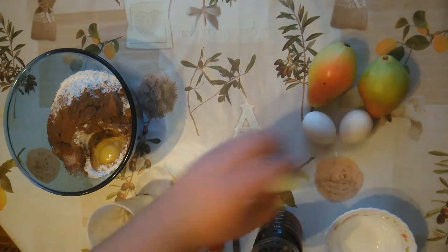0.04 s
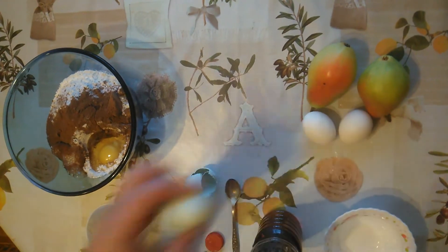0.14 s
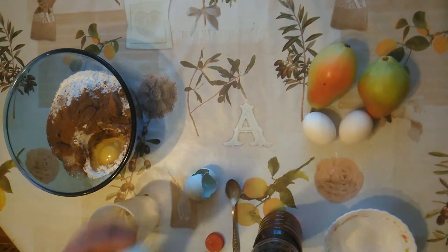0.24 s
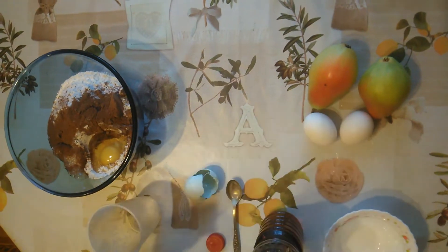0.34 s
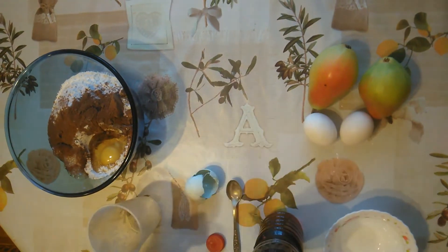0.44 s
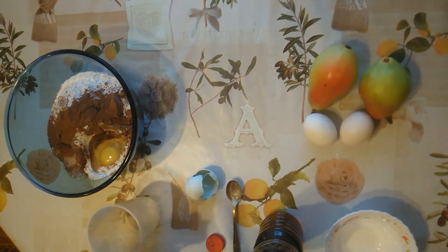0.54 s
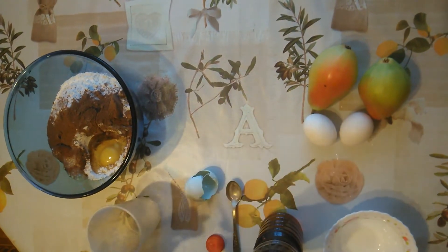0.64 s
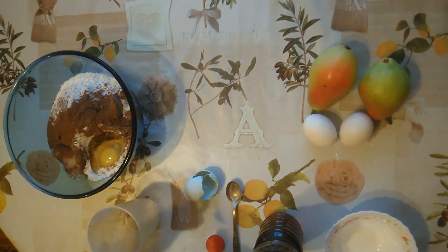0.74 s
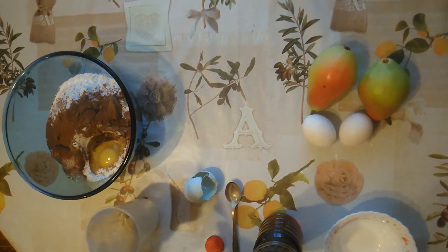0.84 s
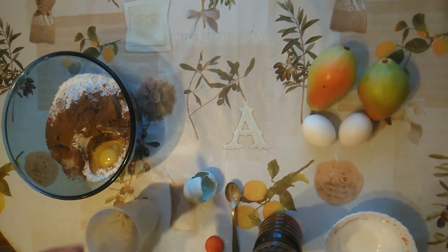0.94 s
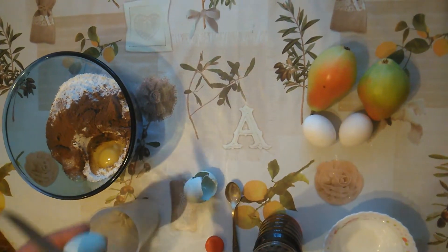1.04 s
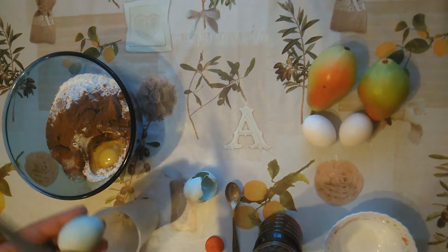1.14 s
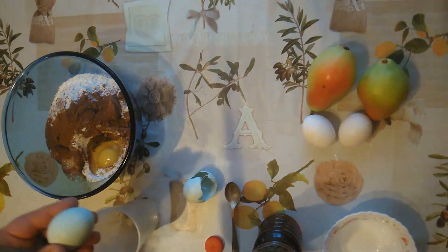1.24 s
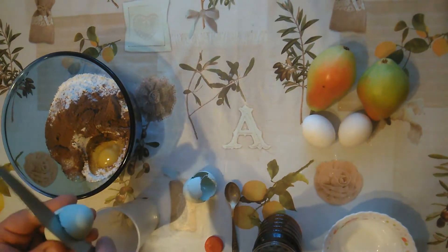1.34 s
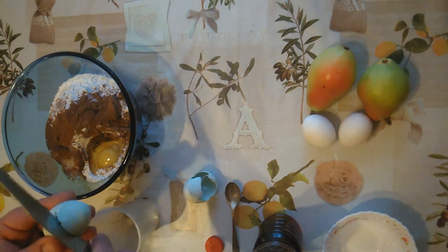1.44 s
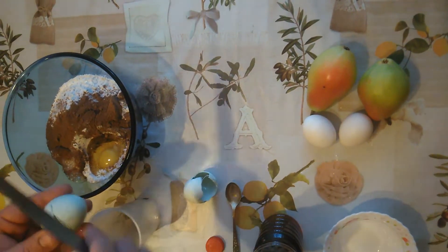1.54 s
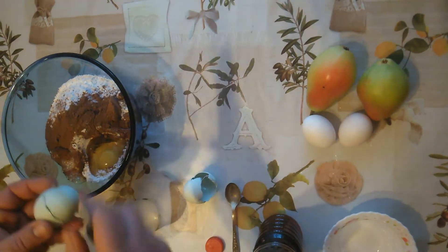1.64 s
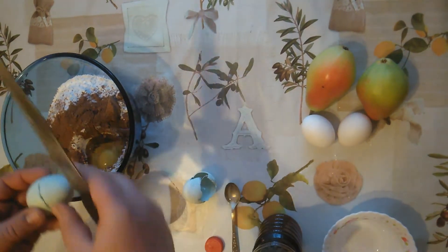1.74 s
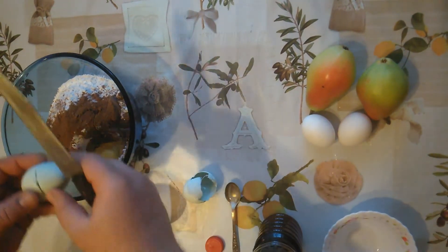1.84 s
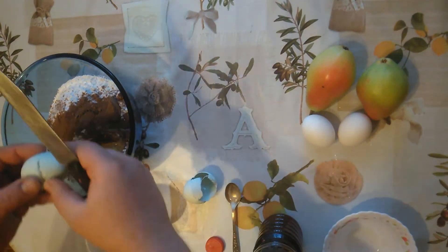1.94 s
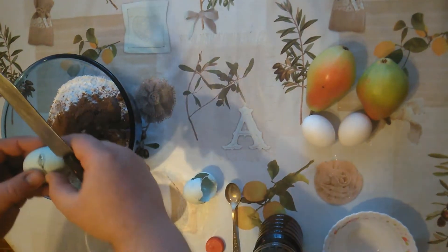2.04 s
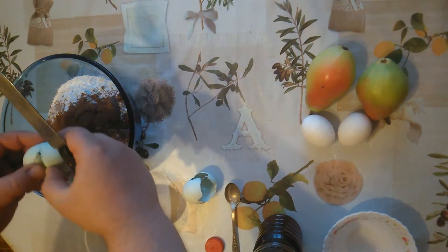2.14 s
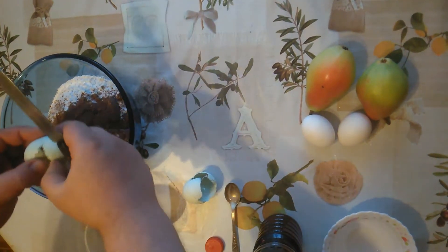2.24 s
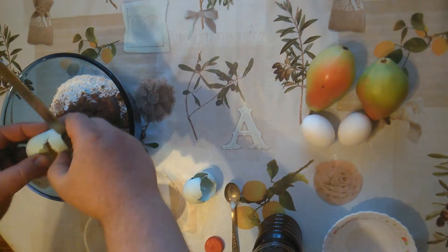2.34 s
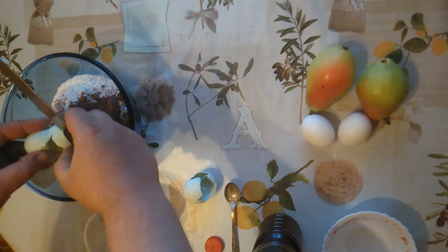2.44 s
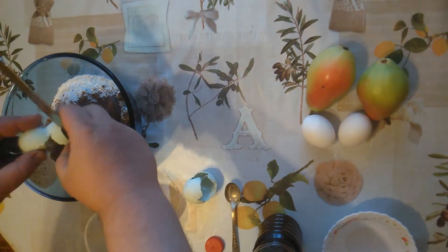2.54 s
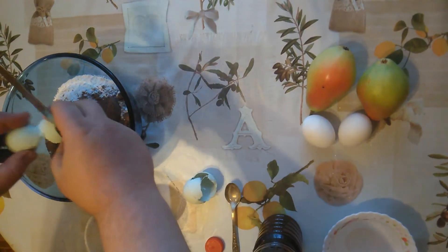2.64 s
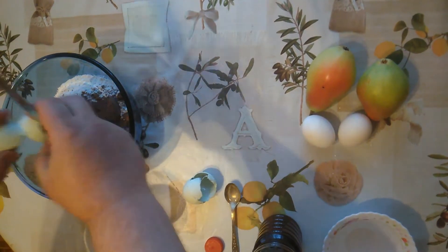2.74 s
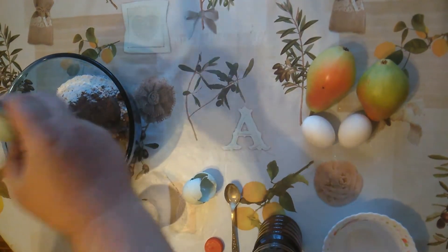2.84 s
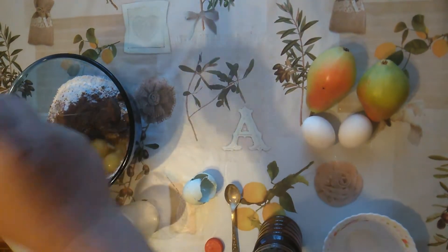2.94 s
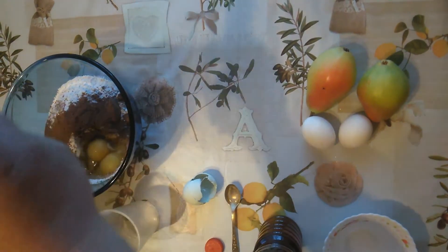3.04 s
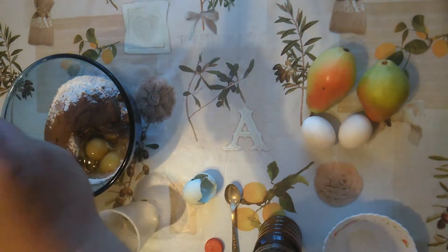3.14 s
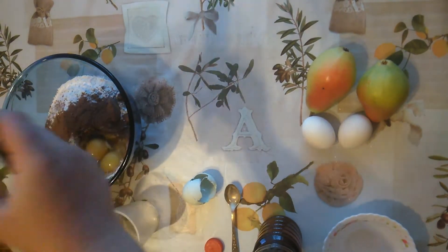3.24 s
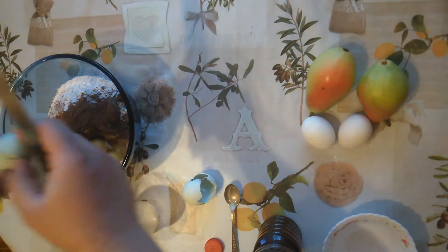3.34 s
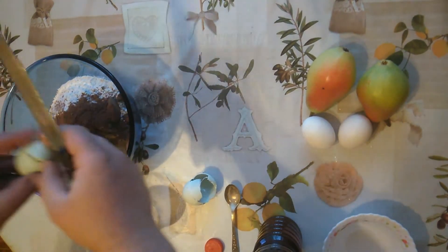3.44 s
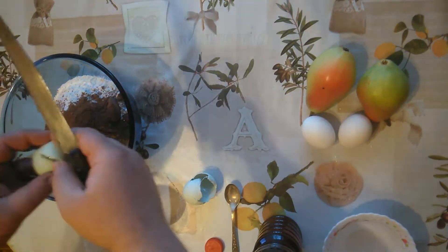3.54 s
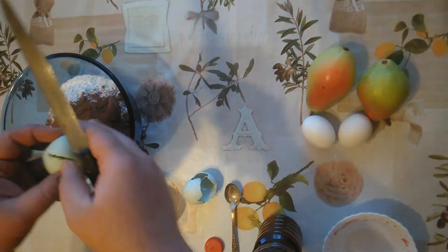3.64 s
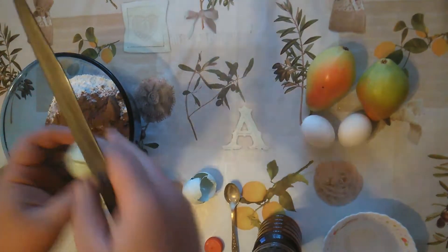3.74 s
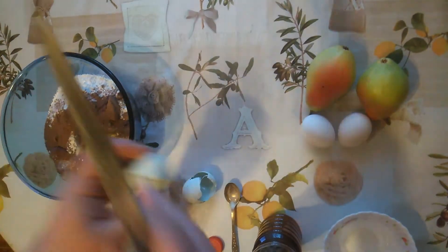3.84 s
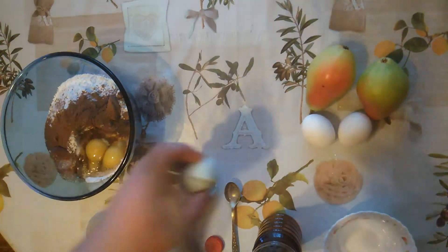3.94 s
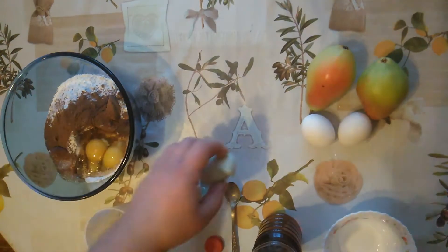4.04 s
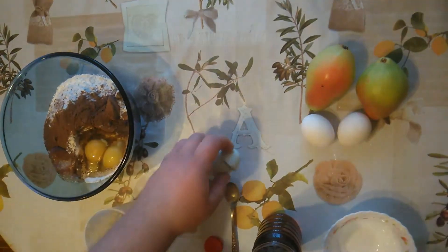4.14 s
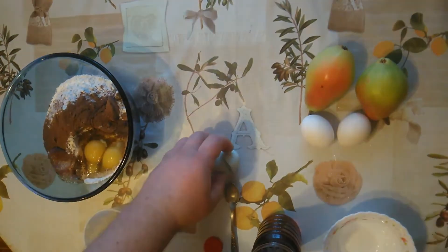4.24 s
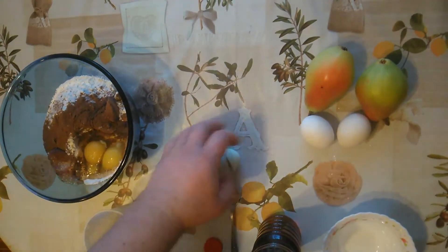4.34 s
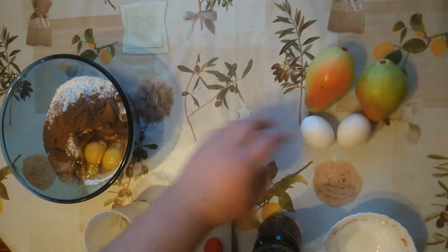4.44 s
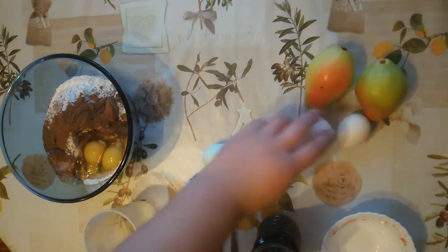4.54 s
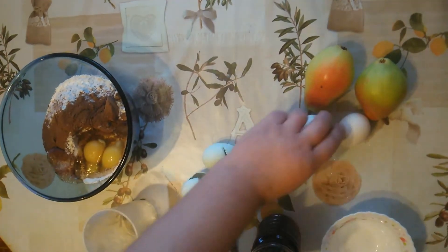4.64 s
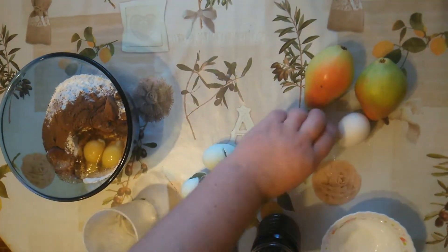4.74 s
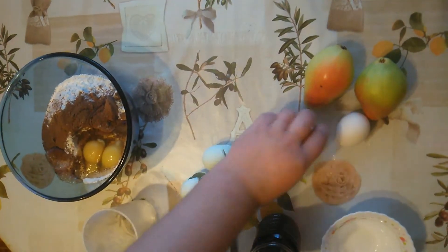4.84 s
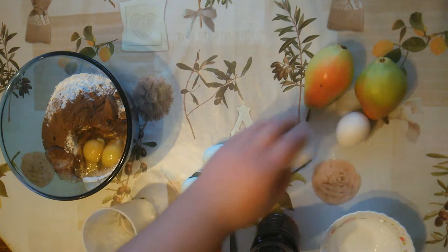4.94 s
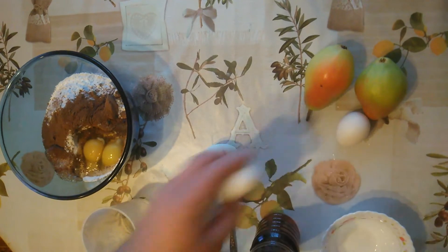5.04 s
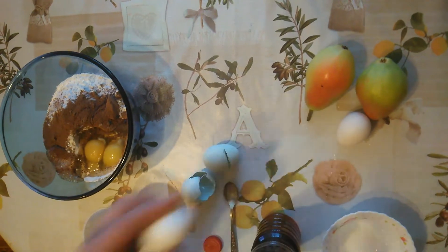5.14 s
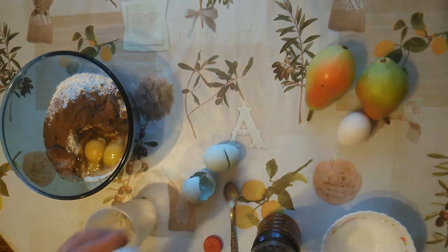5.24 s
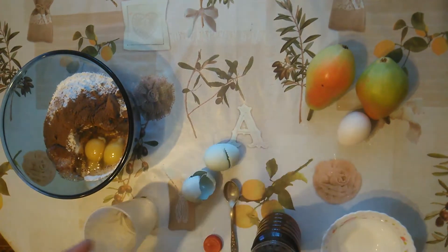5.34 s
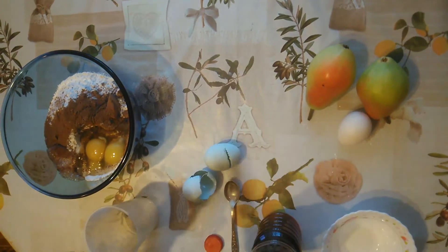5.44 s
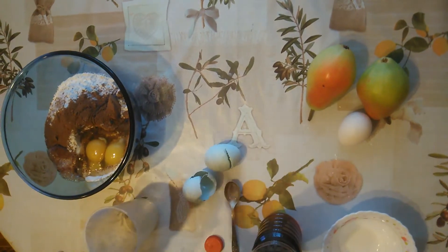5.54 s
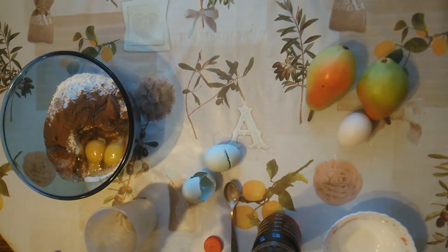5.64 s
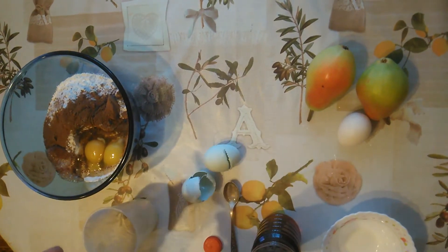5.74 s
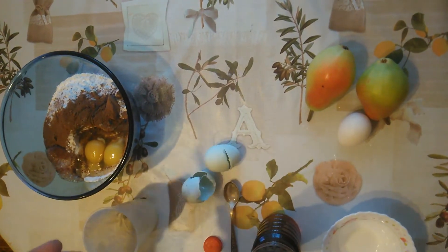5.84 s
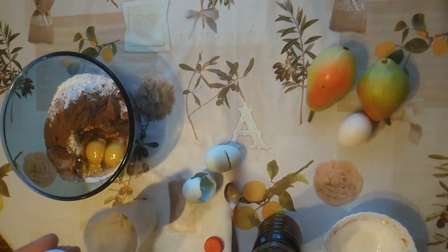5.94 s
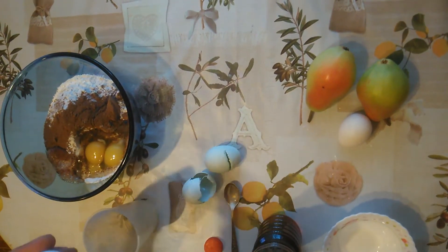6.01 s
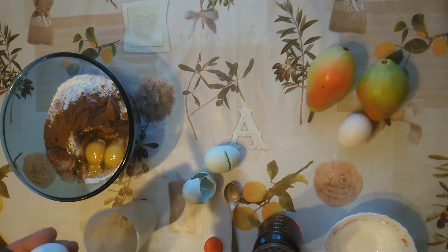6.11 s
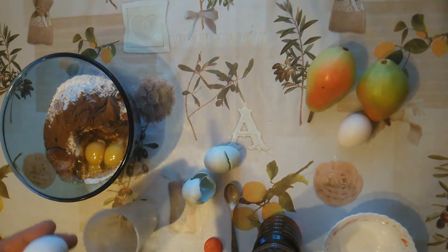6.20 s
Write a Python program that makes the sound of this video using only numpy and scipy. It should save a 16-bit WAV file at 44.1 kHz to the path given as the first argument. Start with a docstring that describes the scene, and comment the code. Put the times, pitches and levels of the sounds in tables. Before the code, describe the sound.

Egg cracked with a kitchen knife: a sharp tap, brittle shell crunching, soft table bumps, light clatter, then another tap.

```python
"""A kitchen knife cracks an egg over a glass bowl in a small kitchen. The blade knocks the egg, sinks in steps
and rings. As it prises the shell open, the edges grind and snap into a hollow of falling pitch; the halves
crackle and are laid on the table. Something clatters lightly, as of the knife being taken up, and the knife
strikes again. Underneath: arm movement, soft bumps, still air, an appliance's whine and a faint passing tone."""
import sys
import numpy as np
from scipy import signal
from scipy.fft import rfft, irfft, next_fast_len
from scipy.io import wavfile

SR = 44100
rng = np.random.default_rng(int(sys.argv[2]) if len(sys.argv) > 2 else 0)


def file_out(sig):
    """Save sig as 16-bit WAV at sys.argv[1]."""
    # one column per channel
    cols = np.atleast_2d(sig).T
    # limit, then scale
    lim = np.clip(cols, -1, 1)
    pcm = np.round(lim * 32767).astype(np.int16)
    wavfile.write(sys.argv[1], SR, pcm)


N = 276507
TIME_S = np.arange(N) / SR

# still air: (frequency [Hz], gain [dB])
AIR_SPECTRUM = [(30, -18.5), (100, -11.5), (250, -4), (400, -4), (800, -0.5), (1150, -15), (1350, -18.5),
                (2500, -16.5), (3100, -28), (4500, -27.5), (7000, -36), (12500, -41), (16000, -54.5)]
# appliance whine: (frequency [Hz], rms [dB])
WHINE_PARTIALS = [(1086, -71), (2077, -71.5)]
# faint tone: (start [s], end [s], level [dB], frequency [Hz])
TONE_SWELLS = [(1.14, 1.42, -54, 696), (2.34, 2.58, -57, 698), (2.96, 3.22, -52, 694)]

# arm movement: (time [s], boom [dB], rustle [dB])
ARM_LEVELS = [(0, -67, -55), (0.18, -64, -50.5), (0.35, -70, -63.5), (0.7, -68, -61.5), (1.3, -61.5, -53),
              (1.7, -67, -53), (2.0, -64.5, -60), (2.19, -60.5, -50), (2.28, -64.5, -60),
              (2.45, -54, -50.5), (2.72, -53, -46), (2.95, -52, -56.5), (3.25, -58, -55.5), (3.6, -51, -49),
              (3.9, -54.5, -52), (4.25, -65, -57.5), (4.45, -54, -51), (5.1, -57, -59), (5.8, -52.5, -55),
              (6.27, -61, -56)]
# hands and eggs bumping the table: (peak time [s], level [dB])
TABLE_BUMPS = [(0.1, -58.5), (0.2, -51.5), (0.52, -61), (1.12, -52.5), (1.33, -54.5), (2.36, -47),
               (2.72, -51), (4.001, -48.5), (4.079, -41), (4.17, -46.5), (4.86, -47), (4.93, -44.5),
               (5.1, -48.5), (5.26, -44), (5.6, -45), (5.67, -45.5), (6.04, -56)]
# low resonances: (frequency [Hz], width [Hz], gain [dB])
BOOM_MODES = [(221.9, 11.5, 0), (262.2, 24, 2), (304, 51, -6.5), (342, 300, -19.5), (144, 94, -20.5)]
# arm rustle: (frequency [Hz], gain [dB])
RUSTLE_SPECTRUM = [(100, -18), (300, -3.5), (450, 0), (750, 0.5), (1150, -8), (1700, -15), (2550, -10.5),
                   (3100, -21.5), (4600, -22), (7000, -32), (15000, -43)]

# rubs on shell or table: (start [s], end [s], level [dB], resonance [Hz], width [Hz], grit [dB])
RUB_STROKES = [(0.882, 0.917, -65.5, 3330, 1490, -30), (1.288, 1.359, -57, 157, 70.8, -29.5),
               (1.556, 1.58, -43.5, 5250, 800, -6), (1.574, 1.602, -39, 1160, 455, 3.5),
               (1.578, 1.604, -36, 3670, 696, -18), (2.148, 2.252, -54.5, 2740, 135, 0.5),
               (3.286, 3.41, -62, 94, 70, -34), (5.60, 5.684, -62.5, 112, 71, -26),
               (6.098, 6.105, -44, 1980, 400, -28), (6.143, 6.17, -44, 2070, 600, -33)]
# splintering shell: (frequency [Hz], gain [dB])
SPLINTER_SPECTRUM = [(100, -47.5), (400, -21), (900, 4.5), (2400, 13), (3150, 4), (4200, 4.5), (5800, -0.5),
                     (6700, -9), (11500, -20), (16000, -34)]

# knife strikes: (time [s], level [dB], sinking time [s], blade ring [dB], shell crunch [dB])
KNIFE_STRIKES = [(1.4006, -1, .019, -6, -22), (6.1604, 1.5, .002, -30, -29.5)]
# full egg: (frequency [Hz], width [Hz], gain [dB])
EGG_MODES = [(880, 280, -1), (1237, 200, 2), (2076, 180, 4), (2770, 880, -9), (3370, 870, -12.5),
             (4570, 530, -17.5)]
# knife blade: (frequency [Hz], level [dB], T60 [s])
BLADE_MODES = [(765, -7, .13), (867, 0, .13), (1112, -10, .13), (1240, -12, .13), (1938, -8, .07),
               (2130, -8, .12), (2195, -7, .09), (2490, -15, .15), (2692, -12, .16), (2845, -16, .16),
               (3558, -13, .11), (5017, -21, .1)]

# hollow under the shell, falling as the egg opens: (time [s], pitch [Hz])
HOLLOW_PITCH = [(2.376, 3390), (2.40, 2600), (2.455, 2290), (2.468, 1710), (2.505, 1506), (3.35, 1440),
                (3.56, 1360), (3.7, 1422), (4.38, 1377), (4.42, 1270)]
# gestures that grind the broken edges: (time [s], force [dB], brightness [dB])
GRIND_PRISING = [(2.372, -59, -11), (2.38, -31.5, -15), (2.455, -40, -9), (2.48, -36.5, -3.5),
                 (2.53, -36, -1.5), (2.58, -48.5, -18), (2.69, -76, -26), (2.72, -48, 0), (2.79, -71, -12),
                 (2.87, -55, -25), (2.93, -71, -18)]
GRIND_SQUEEZING = [(3.07, -64.5, 1), (3.28, -56.5, -6.5), (3.32, -44, -5.5), (3.45, -44, -5.5),
                   (3.48, -35, -27), (3.56, -30, -4.5), (3.625, -39.5, -1), (3.66, -35, 6),
                   (3.71, -35.5, 0.5), (3.74, -53, 5)]
GRIND_SETTING_DOWN = [(4.3, -57, -20), (4.335, -43.5, -14.5), (4.365, -42, -10), (4.39, -33, -7.5),
                      (4.44, -37.5, -14.5), (4.48, -49.5, -9), (4.58, -51.5, -5), (4.8, -54.5, -8.5),
                      (4.92, -63, -6.5)]
# shell snaps: (time [s], body [dB], treble [dB])
SHELL_SNAPS = [(2.376, -26, -36), (2.394, -15.5, -30), (2.4014, -20, -41), (2.4696, -22, -16),
               (2.5041, -21, -27), (2.6416, -32, -37.5), (2.7023, -34, -25.5), (2.7507, -44, -39),
               (3.2038, -39.5, -46), (3.265, -34.5, -41), (3.302, -33, -27), (3.3472, -23.5, -33),
               (3.36, -23, -28.5), (3.4111, -23, -48), (3.4764, -16, -28), (3.4875, -16.5, -29),
               (3.538, -9, -22), (3.5426, -14, -24), (3.55, -18, -33), (3.5863, -9, -14.5),
               (3.6365, -8.5, -15.5), (3.6706, -14.5, -17.5), (3.701, -15.5, -21), (4.0936, -19, -18.5),
               (4.3317, -33.5, -38), (4.3821, -28, -23.5), (4.392, -33, -37)]

# light clatter, as of a knife taken up: (time [s], level [dB])
BOUNCES = [(5.8199, -26), (5.8224, -33), (5.8300, -31.5), (5.8365, -27), (5.8430, -52), (5.8500, -31.5),
           (5.8690, -34.5)]
# clattering object: (frequency [Hz], level [dB], T60 [s])
BOUNCE_MODES = [(632, 0, .1), (735, -5, .07), (840, -2, .07), (1175, -5, .07), (1300, -5, .06),
                (1635, -11, .07), (2400, -9, .05), (2740, -8, .05), (3700, -14, .05), (4250, -4, .07),
                (5400, -13, .07), (6700, -19, .06)]

# kitchen echo: (frequency [Hz], gain [dB])
ROOM_SPECTRUM = [(150, -14), (500, 3), (900, -1), (1350, -2), (1720, -0.5), (2100, -2.5), (2750, 0),
                 (3100, -7.5), (3800, 2), (5600, 1.5), (6800, -0.5), (15000, 0.5)]
# kitchen decay: (frequency [Hz], T60 [s])
ROOM_DECAY = [(300, .42), (1200, .37), (2600, .41), (3800, .27), (6000, .28), (12000, .25)]


def from_db(db):
    return 10 ** (np.asarray(db) / 20)


def unit_rms(x):
    return x / np.sqrt(np.mean(x ** 2) + 1e-20)


def unit_peak(x):
    return x / (np.abs(x).max() + 1e-20)


def at_hz(points, hz):
    """Table lookup on a log-frequency axis."""
    points_hz, values = np.transpose(points)
    return np.interp(np.log(np.maximum(hz, 1)), np.log(points_hz), values)


def add(out, time_s, sound):
    start = max(round(time_s * SR), 0)
    out[start:start + len(sound)] += sound[:max(N - start, 0)]


def lowpass(x, edge_hz, order=2):
    return signal.sosfilt(signal.butter(order, edge_hz, fs=SR, output="sos"), x)


def highpass(x, edge_hz):
    return signal.sosfilt(signal.butter(2, edge_hz, "high", fs=SR, output="sos"), x)


def colour(x, spectrum):
    """Minimum-phase filter from a (frequency [Hz], gain [dB]) table."""
    size = 2 * next_fast_len(len(x))
    bins_hz = np.arange(size // 2 + 1) * SR / size
    cepstrum = irfft(np.log(from_db(at_hz(spectrum, bins_hz))))
    cepstrum[1:size // 2] *= 2
    cepstrum[size // 2 + 1:] = 0
    return irfft(rfft(x, size) * np.exp(rfft(cepstrum)))[:len(x)]


def resonate(x, hz, width_hz):
    """Two-pole resonance, unity peak gain."""
    radius = np.exp(-np.pi * width_hz / SR)
    gain = (1 - radius ** 2) / 2
    feedback = [1, -2 * radius * np.cos(2 * np.pi * hz / SR), radius ** 2]
    return signal.lfilter([gain, 0, -gain], feedback, x)


def resonate_steep(x, hz, width_hz):
    """Two resonances in series: steep skirts, rounded rise."""
    return resonate(resonate(x, hz, width_hz), hz, width_hz)


def resonate_gliding(x, hz, width_hz):
    """Steep resonance with moving pitch."""
    carrier = np.exp(2j * np.pi * np.cumsum(hz) / SR)
    radius = np.exp(-np.pi * width_hz / SR)
    baseband = signal.lfilter([(1 - radius) ** 2], [1, -2 * radius, radius ** 2], x / carrier)
    return np.real(carrier * baseband)


def waver(size, rate_hz):
    """Linear ramps between random values."""
    return np.interp(TIME_S[:size] * rate_hz, np.arange(600), rng.standard_normal(600))


def background(air_db=-65.5):
    """Still air, steady appliance whine and a faint tone that comes and goes."""
    out = from_db(air_db) * unit_rms(colour(rng.standard_normal(N), AIR_SPECTRUM))
    for hz, db in WHINE_PARTIALS:
        out += from_db(db) * unit_rms(np.sin(2 * np.pi * hz * TIME_S))
    for start_s, end_s, db, hz in TONE_SWELLS:
        swell = signal.windows.tukey(round((end_s - start_s) * SR), .7)
        tone = resonate_steep(rng.standard_normal(SR), hz, width_hz=30)[-len(swell):]
        add(out, start_s, from_db(db) * swell * unit_rms(tone))
    return out


def arm_movement(boom_waver_db=3.5, rustle_waver_db=3, waver_hz=22,
                 attack_s=.026, release_s=.03, puff_db=-9):
    """Arms stir low resonances and an uneven rustle; soft bumps add boom and a dull puff."""
    bumps = np.zeros(N)
    for peak_s, db in TABLE_BUMPS:
        slope_s = np.where(TIME_S < peak_s, attack_s, release_s)
        bumps += from_db(db) * np.exp(-((TIME_S - peak_s) / slope_s) ** 2)
    boom = unit_rms(sum(from_db(db) * resonate_steep(rng.standard_normal(N), hz, width_hz)
                        for hz, width_hz, db in BOOM_MODES))
    rustle = unit_rms(colour(rng.standard_normal(N), RUSTLE_SPECTRUM))
    puff = unit_rms(lowpass(colour(rng.standard_normal(N), RUSTLE_SPECTRUM), edge_hz=1000))
    times_s, boom_db, rustle_db = np.transpose(ARM_LEVELS)
    boom_gain = from_db(np.interp(TIME_S, times_s, boom_db) + boom_waver_db * waver(N, waver_hz))
    rustle_gain = from_db(np.interp(TIME_S, times_s, rustle_db) + rustle_waver_db * waver(N, waver_hz))
    return np.hypot(boom_gain, bumps) * boom + rustle_gain * rustle + from_db(puff_db) * bumps * puff


def slipping(size, slips_per_s=1300, spread_db=3.5, pressure_db=1, pressure_hz=60):
    """Friction force: uneven slips under wavering pressure."""
    slips = (rng.random(size) < slips_per_s / SR) * rng.choice([-1, 1], size)
    strength = from_db(spread_db * rng.standard_normal(size))
    hiss = .035 * rng.standard_normal(size)
    return (slips * strength + hiss) * from_db(pressure_db * waver(size, pressure_hz))


def scrape(slips, hz, width_hz, grit_db):
    """Slips excite one resonance and shed grit."""
    body = unit_rms(resonate_steep(slips, hz, width_hz))
    return body + from_db(grit_db) * unit_rms(colour(slips, SPLINTER_SPECTRUM))


def rubs():
    """Blade and hands rub shell or table in short swells of slips."""
    out = np.zeros(N)
    for start_s, end_s, db, hz, width_hz, grit_db in RUB_STROKES:
        size = round((end_s - start_s) * SR)
        slips = slipping(size) * signal.windows.tukey(size, .4)
        slips = np.pad(slips, (0, size))   # room to ring out
        add(out, start_s, from_db(db) * scrape(slips, hz, width_hz, grit_db) / np.sqrt(2))
    return out


def fracture(crumble_s, crumble_db, size=2000):
    """Force of one sharp break and a dying trail of tiny ones."""
    force = from_db(crumble_db) * rng.standard_normal(size) * np.exp(-TIME_S[:size] / crumble_s)
    force[0] = 1
    return force


def egg_knock(hardness_db_per_octave):
    """Knock on the full egg; hard contact favours the high modes."""
    hz, width_hz, db = np.transpose(EGG_MODES)
    force = fracture(crumble_s=.00068, crumble_db=-24)
    gains = from_db(db + hardness_db_per_octave * np.log2(hz / hz[0]))
    modes = sum((-1) ** k * gains[k] * resonate(force, hz[k], width_hz[k]) for k in range(len(hz)))
    return unit_peak(lowpass(modes, edge_hz=5000))


def splintering(run_s, size=2000):
    """A running crack: a bright burst of tiny breaks swells and dies."""
    age = TIME_S[:size] / run_s
    burst = rng.standard_normal(size) * np.sqrt(age) * np.exp(-age)
    return unit_peak(colour(burst, SPLINTER_SPECTRUM))


def ringing(modes, scatter_db, size=12000):
    """Free decay of struck modes, levels randomised by scatter_db."""
    hz, db, t60_s = np.transpose(modes)[:, :, None]
    age_s = TIME_S[:size]
    start_db = db + scatter_db * rng.standard_normal(db.shape)
    partials = from_db(start_db - 60 * age_s / t60_s) * np.sin(2 * np.pi * hz * age_s)
    return unit_peak(partials.sum(axis=0))


def knife_strikes(step_s=.0013, step_growth=1.32, step_loss_db=1.6, max_steps=8,
                  splinter_db=-12, crunch_decay_s=.041, main_mode_db=.5, size=6000):
    """The blade sinks in slowing, weakening steps, then rings on while the shell crunches."""
    out = np.zeros(N)
    delays_s = step_s * (step_growth ** np.arange(max_steps) - 1) / (step_growth - 1)
    for time_s, db, sinking_s, ring_db, crunch_db in KNIFE_STRIKES:
        for k, delay_s in enumerate(delays_s):
            knock = egg_knock(hardness_db_per_octave=5 if k == 0 else -3)   # whole shell, then broken
            step = knock + from_db(splinter_db) * splintering(run_s=.002)
            if delay_s <= sinking_s:
                add(out, time_s + delay_s, from_db(db - step_loss_db * k) * step)
        crunch = scrape(slipping(size), hz=2470, width_hz=910, grit_db=-3)
        crunch *= np.exp(-TIME_S[:size] / crunch_decay_s)
        # the blade's main mode swells and is damped by the egg
        main_mode = unit_peak(resonate_steep(signal.unit_impulse(size), hz=877, width_hz=69))
        add(out, time_s + step_s, from_db(crunch_db) * crunch)
        add(out, time_s + step_s, from_db(ring_db + main_mode_db) * main_mode)
        add(out, time_s + step_s, from_db(ring_db) * ringing(BLADE_MODES, scatter_db=0))
    return highpass(out, edge_hz=600)   # small objects radiate little bass


def hollow_hz(time_s):
    return np.interp(time_s, *np.transpose(HOLLOW_PITCH))


def shell_grinding(pitch_scatter=.085, shifts_per_s=350, overtone_ratio=1.63, grit_db=-9):
    """Broken edges slip and excite the shell's hollow; sharp contacts add overtone and grit."""
    out = np.zeros(N)
    for gesture in (GRIND_PRISING, GRIND_SQUEEZING, GRIND_SETTING_DOWN):
        times_s, force_db, bright_db = np.transpose(gesture)
        span_s = np.arange(times_s[0], times_s[-1], 1 / SR)
        slips = slipping(len(span_s), slips_per_s=1100, spread_db=2.5, pressure_db=3.5, pressure_hz=90)
        contact_shift = np.exp(pitch_scatter * waver(len(span_s), shifts_per_s))
        hz = hollow_hz(span_s) * contact_shift
        body = unit_rms(resonate_gliding(slips, hz, width_hz=310))
        overtone = unit_rms(resonate_gliding(slips, hz * overtone_ratio, width_hz=750))
        grit = from_db(grit_db) * unit_rms(colour(slips, SPLINTER_SPECTRUM))
        force = from_db(np.interp(span_s, times_s, force_db))
        brightness = from_db(np.interp(span_s, times_s, bright_db))
        add(out, times_s[0], force * (body + brightness * (overtone + grit)))
    return highpass(out, edge_hz=550)


def shell_snaps(overtone_ratio=1.107, overtone_db=-11):
    """Each snap rings the shell's hollow; crisp ones add overtone and splinters."""
    out = np.zeros(N)
    for time_s, body_db, treble_db in SHELL_SNAPS:
        force = fracture(crumble_s=.0027, crumble_db=-22.5)
        hz = hollow_hz(time_s)
        body = unit_peak(resonate_steep(force, hz, width_hz=250))
        overtone = unit_peak(resonate_steep(force, hz * overtone_ratio, width_hz=500))
        treble = from_db(overtone_db) * overtone + splintering(run_s=.0019)
        add(out, time_s, from_db(body_db) * body + from_db(treble_db) * treble)
    return lowpass(out, edge_hz=8000, order=1)


def clatter(ring_db=3, tick_db=-9.5):
    """Light bounces, each a tick with its own mix of modes."""
    out = np.zeros(N)
    for time_s, db in BOUNCES:
        add(out, time_s, from_db(db + ring_db) * ringing(BOUNCE_MODES, scatter_db=2))
        add(out, time_s, from_db(db + tick_db) * splintering(run_s=.0096))
    return highpass(out, edge_hz=400)


def kitchen_echo(x, early_db=-9, early_decay_s=.0088, tail_db=-7.5, gap_s=.003, size=26000):
    """Quick reflections off bowl and table, then a room tail whose treble dies first."""
    age_s = TIME_S[:size]
    white = rfft(rng.standard_normal(size))
    bins_hz = np.arange(len(white)) * SR / size
    centres_hz, t60s_s = np.transpose(ROOM_DECAY)
    tail = np.zeros(size)
    for band_weights, t60_s in zip(np.eye(len(t60s_s)), t60s_s):
        band = irfft(white * at_hz(np.c_[centres_hz, band_weights], bins_hz))
        tail += band * from_db(-60 * age_s / t60_s)
    early = rng.standard_normal(size) * np.exp(-age_s / early_decay_s)
    response = (from_db(early_db) * unit_rms(early) + from_db(tail_db) * unit_rms(tail)) / np.sqrt(size)
    out = np.zeros(N)
    add(out, gap_s, signal.fftconvolve(x, colour(response, ROOM_SPECTRUM))[:N])
    return out


def scene():
    """Mono mix: contact sounds and their echo over movement and background."""
    contacts = knife_strikes() + shell_snaps() + shell_grinding() + rubs() + clatter()
    return (contacts + kitchen_echo(contacts) + arm_movement() + background())[None]


def record(dry, bass_cut_hz=55, top_cut_hz=15700):
    """The hardest strikes just overload the microphone; deep bass and top are cut."""
    clipped = dry / (1 + dry ** 8) ** (1 / 8)
    top_cut = signal.ellip(10, .1, 80, top_cut_hz, fs=SR, output="sos")
    return signal.sosfilt(top_cut, highpass(clipped, bass_cut_hz))


dry = scene()
out = record(dry)
file_out(out)
```